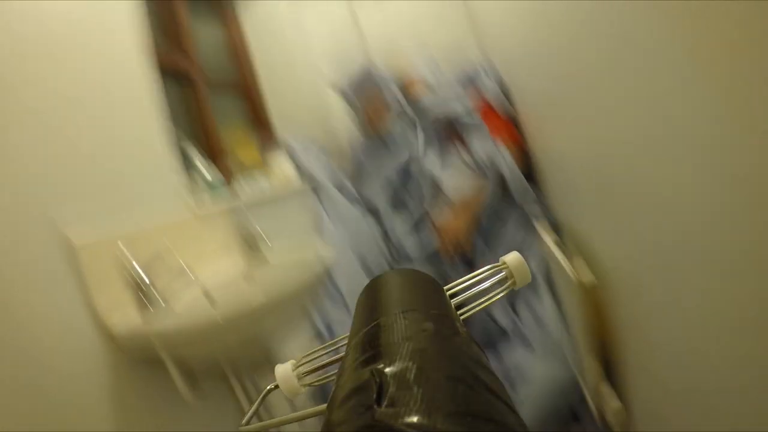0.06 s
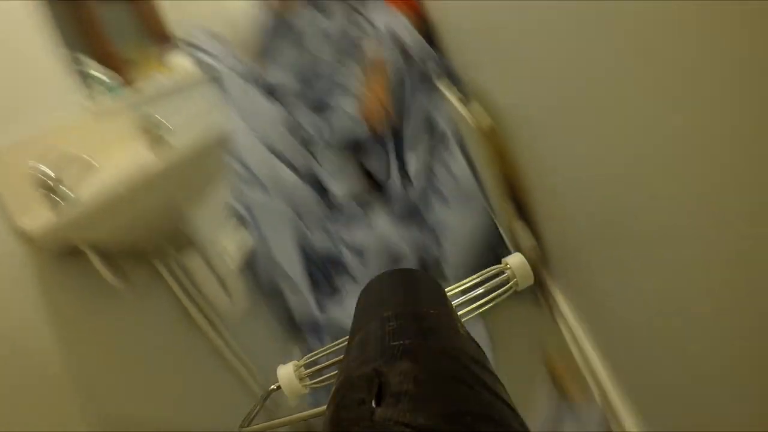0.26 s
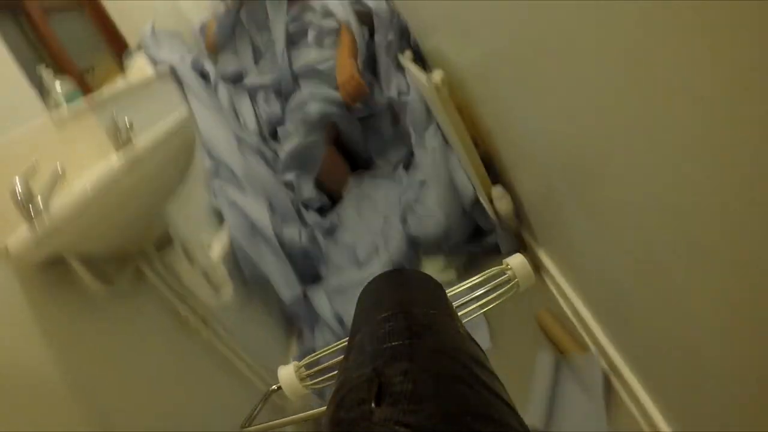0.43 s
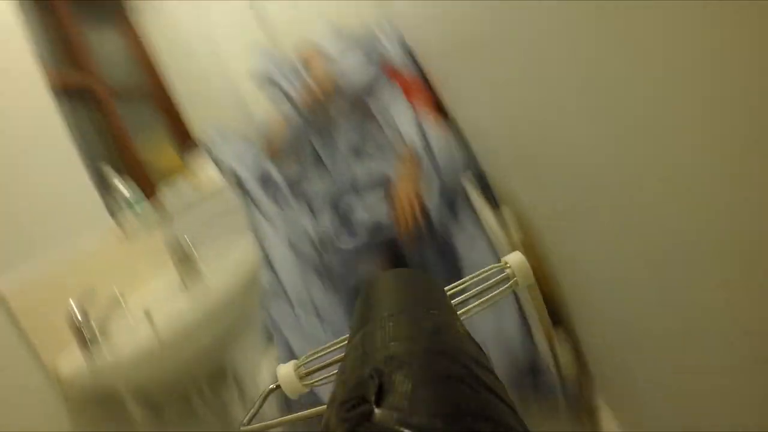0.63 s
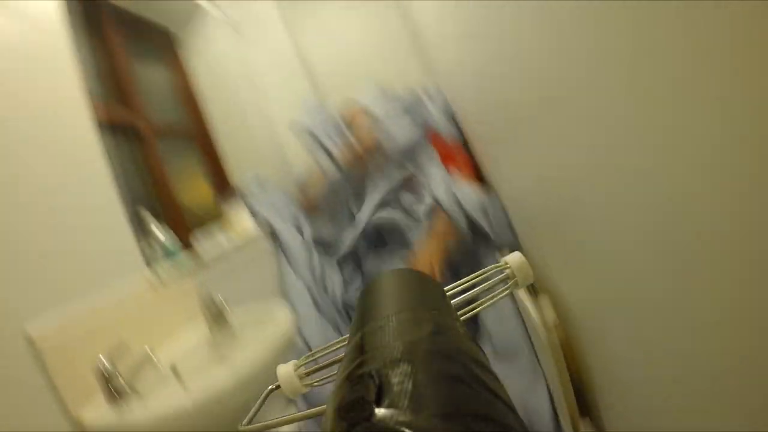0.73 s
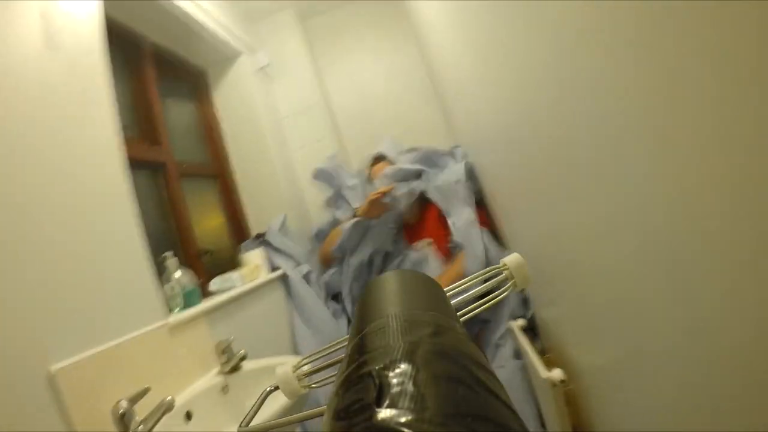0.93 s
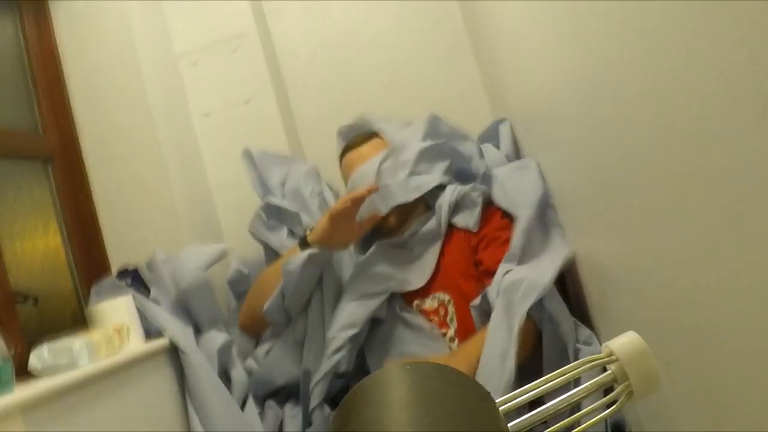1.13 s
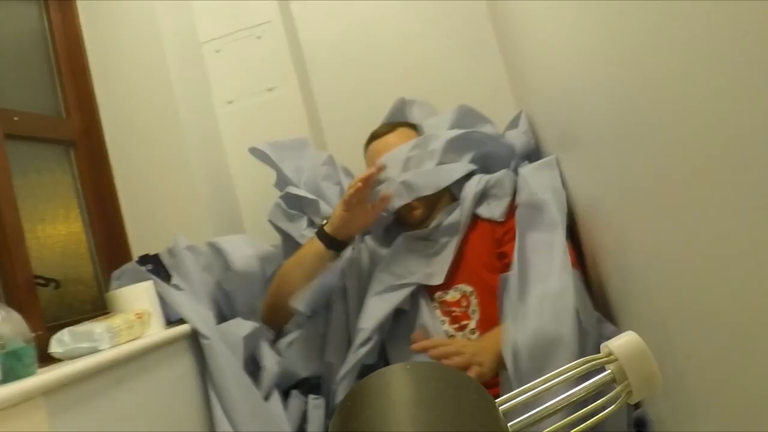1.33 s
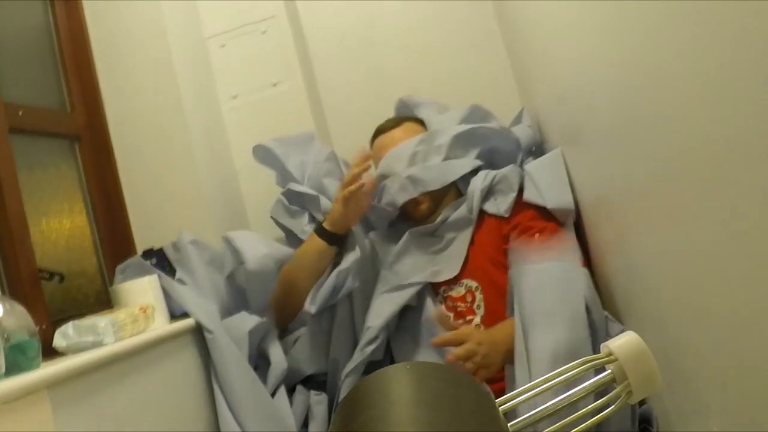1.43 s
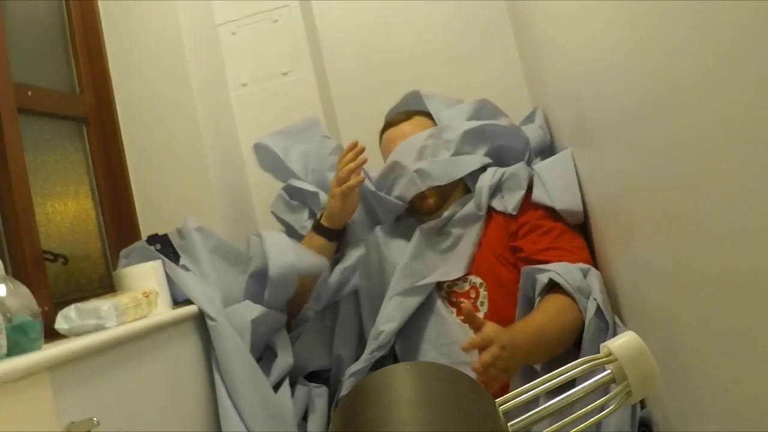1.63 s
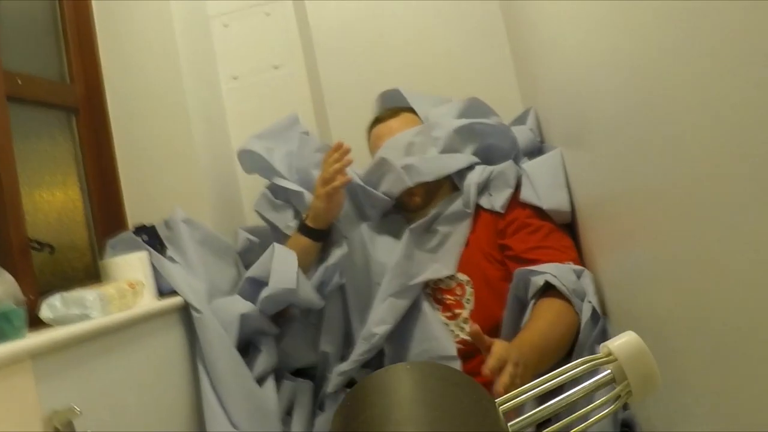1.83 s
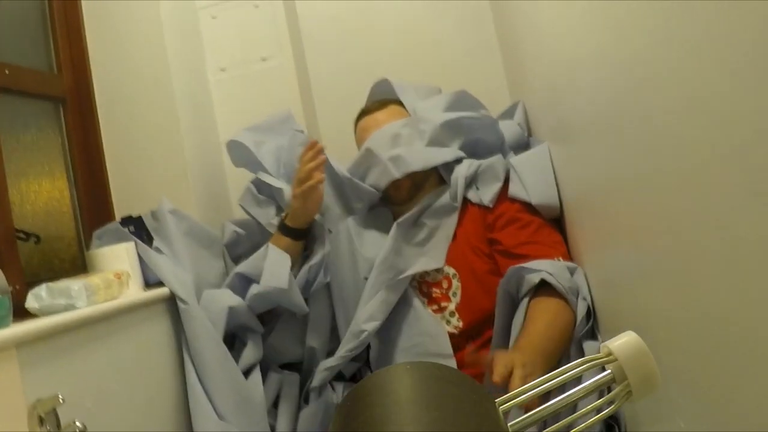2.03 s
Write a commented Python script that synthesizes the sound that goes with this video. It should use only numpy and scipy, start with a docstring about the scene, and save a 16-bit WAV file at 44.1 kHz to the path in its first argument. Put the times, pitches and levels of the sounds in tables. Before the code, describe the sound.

A handheld electric leaf blower, close up in a small bathroom, runs at full speed from 0 to about 0.86 seconds: a strong steady hum, wavering thin whines and bright rushing air. Then it switches off; hum and whines slide down quickly, with a tiny dip near 1.16. Until about 2.07 the duller fan coasts, weak tones swelling and fading over soft rumble, with a low tone rising at the end.

```python
"""A handheld electric leaf blower first runs at full speed: shaft hum, whines and a bright rush of air.
At about 0.86 s it starts to slow down, and hum and whines slide lower while other tones swell and fade.
The rush hands over to the duller noise of the coasting fan, and the level dips briefly near 1.16 s.
Tones are gliding sine waves; air, rumble and the swelling bands are filtered noise.
"""
import sys
import numpy as np
from scipy.fft import rfft, irfft, next_fast_len
from scipy.io import wavfile
from scipy.ndimage import map_coordinates

SR = 44100
rng = np.random.default_rng(int(sys.argv[2]) if len(sys.argv) > 2 else 0)


def transcribe(signal):
    """Save signal, clipped to [-1, 1], as a 16-bit WAV file at the path in sys.argv[1]."""
    frames = np.atleast_2d(signal).T
    limited = np.clip(frames, -1, 1)
    pcm = np.round(limited * 32767).astype(np.int16)
    wavfile.write(sys.argv[1], SR, pcm)


N = 91419
T = np.arange(N) / SR  # time of each sample, seconds

# Speed of the motor shaft. Each row: time in seconds, speed in turns per second.
SHAFT_SPEED = [(0, 304.5), (.86, 304.5), (.91, 271), (.97, 230), (1.05, 199), (1.1, 184), (1.16, 164),
               (1.3, 134), (1.43, 115), (1.56, 101), (1.7, 85), (1.8, 74.5), (1.9, 65), (2.0, 57),
               (2.07, 51.3)]
# Imbalance hum: follows the shaft, then lingers and throbs on the mount's resonance.
# Each row: time in seconds, pitch in Hz, level in dB before flutter.
HUM_PATH = [(0.02, 303.2, -11), (0.3, 306.8, -14.5), (0.345, 304, -14.5), (0.424, 306.1, -12),
            (0.866, 301.5, -12), (0.88, 292, -15), (0.908, 268.6, -13.5), (0.935, 253.2, -21),
            (0.97, 234.7, -21), (1.01, 212.7, -27.5), (1.088, 186.8, -27.5), (1.132, 169, -42),
            (1.196, 159, -40.5), (1.288, 134, -37.5), (1.414, 115.9, -25), (1.444, 112, -25.5),
            (1.462, 103.4, -37), (1.488, 108.2, -28), (1.51, 113, -30), (1.536, 105.5, -55),
            (1.566, 107.3, -36), (1.58, 111, -37.5)]
# Lower whine, near seven times the shaft speed.
# Each row: time in seconds, pitch in Hz, level in dB, both before wavering.
LOW_WHINE_PATH = [(0, 2072, -38.5), (.08, 2072, -34), (.13, 2075, -49), (.62, 2070, -47), (.7, 2068, -37),
                  (.75, 2068, -42), (.85, 2068, -38), (.885, 2045, -35), (.91, 2010, -39),
                  (.925, 1870, -43), (.955, 1680, -35), (.98, 1620, -41), (1.05, 1430, -47),
                  (1.08, 1320, -42), (1.14, 1270, -44), (1.17, 1120, -46), (1.23, 1070, -45),
                  (1.28, 960, -58), (1.33, 875, -53), (1.4, 800, -58), (1.5, 705, -50), (1.62, 655, -40),
                  (1.7, 580, -54), (1.8, 508, -38), (1.86, 460, -48), (1.89, 438, -38), (1.96, 390, -50)]
# Upper whine. Each row: time in seconds, pitch in Hz, level in dB, both before wavering.
HIGH_WHINE_PATH = [(0, 2196, -54), (.19, 2192, -44), (.28, 2195, -29), (.33, 2195, -39), (.39, 2195, -30),
                   (.43, 2195, -45), (.5, 2190, -35), (.57, 2188, -44), (.62, 2186, -33), (.68, 2205, -40),
                   (.75, 2190, -42), (.86, 2190, -49), (.92, 2030, -42), (.95, 1900, -56), (.98, 1720, -42),
                   (1.005, 1575, -35), (1.032, 1545, -30), (1.045, 1510, -42), (1.085, 1490, -41),
                   (1.11, 1540, -46)]
# Shaft orders (tones locked to the shaft) of the driven motor.
# Each row: pitch at full speed in Hz, level at full speed in dB, both before wavering.
DRIVEN_ORDERS = [(914, -51), (1045, -57), (1580, -56), (1705, -55), (1828, -57), (3654, -53), (5000, -62),
                 (7308, -71)]
# Orders that swell as they cross a housing resonance in the run-down.
# Each row: loudest time in seconds, multiple of the shaft speed, spread in seconds,
# peak level in dB before beating.
SWELLS = [(1.04, 12, .03, -36), (1.135, 12, .022, -41), (1.19, 12, .02, -50), (.95, 23.5, .028, -52),
          (1.04, 23.6, .035, -52), (1.19, 24, .02, -57), (1.25, 23.6, .02, -55), (1.17, 2, .09, -43),
          (1.33, 2.57, .055, -38), (1.45, 2.65, .025, -42), (1.47, 12.9, .06, -52), (1.64, 3.68, .05, -45),
          (1.7, 12.65, .1, -50), (1.94, 12.65, .09, -51), (1.79, 4.55, .05, -49), (1.51, 7.3, .05, -50),
          (1.94, 5.52, .04, -41), (1.705, 18.95, .015, -48), (1.79, 18.95, .04, -44),
          (1.95, 18.95, .05, -43), (2.07, 6.34, .055, -26), (1.54, 2.85, .03, -50)]
# Bands of noise, from narrow ringing to broad hiss, that swell and fade at fixed pitch.
# Each row: centre in Hz, width in Hz, peak level in dB, loudest time in seconds, spread in seconds.
NOISE_BANDS = [(2350, 170, -53, 1.3, .22), (1150, 70, -54, 1.8, .2), (400, 200, -45, 1.0, .07),
               (3520, 150, -50, .92, .07), (2030, 70, -46, .96, .05), (3900, 900, -62, 1.8, .25),
               (9500, 3000, -73, 1.95, .35)]
# Resonances of the plastic housing. Each row: centre in Hz, width in Hz, strength in dB before softening.
HOUSING_RESONANCES = [(337, 52, 26), (2526, 270, 20.5)]
# Loudness of the air rush. Each row: time in seconds, level in dB before the boosts and wavering below.
AIR_LEVEL = [(0.05, -44.5), (0.13, -41.5), (0.37, -42), (0.82, -42.5), (0.88, -38), (1.14, -48.5),
             (1.42, -55), (2.05, -58)]
# Colour of the driven jet. Each row: frequency in Hz, relative level in dB before the housing.
JET_COLOUR = [(300, -16), (400, -16), (527, -27.5), (616, -13.5), (737, -26), (904, -14), (1390, -17.5),
              (1670, -12), (1920, -16), (2140, -6), (2660, -25.5), (3770, -15), (6300, -22), (7400, -37),
              (8900, -35), (11200, -52), (12500, -50), (13300, -40.5), (14600, -51)]
# Colour of the coasting fan. Each row: frequency in Hz, relative level in dB before the housing.
COASTING_COLOUR = [(250, -20.5), (400, -10), (456, -5.5), (755, -8.5), (937, -8), (1140, -3), (1250, -13.5),
                   (1410, -4), (1750, -12.5), (2330, -15.5), (2730, -20.5), (4050, -17), (6100, -26.5),
                   (7000, -35.5), (9500, -40.5), (11000, -53.5), (14000, -56)]
# Colour of the low buffeting. Each row: frequency in Hz, relative level in dB.
RUMBLE_COLOUR = [(12, -9.5), (25, -1.5), (45, -4.5), (75, -4.5), (115, -5.5), (200, -9.5), (270, -9),
                 (400, -22.5), (520, -43)]
# Loudness of the buffeting. Each row: time in seconds, level in dB before wavering.
RUMBLE_PATH = [(0, -46), (.82, -45), (.86, -37), (.95, -43), (1.06, -39), (1.15, -48), (1.5, -46),
               (1.65, -44), (1.8, -42), (2.07, -41)]

HUM_FLUTTER_DB, WHINE_WAVER_DB, ORDER_WAVER_DB = .35, 1.3, 3  # size of the random level changes
DRIVEN_FADE_DB = 30  # lost per halving of speed
WHINE_BEATING = .6  # share of a whine that smears and beats once the motor coasts
SWELL_BEATING, FULL_BEATING_HZ = .55, 1100  # share of a swell that beats, full above this pitch
JET_BOOST_DB, COASTING_BOOST_DB = 5, 8.5
HANDOVER_S, HANDOVER_WIDTH_S = 1.215, 0.21  # middle and width of the change from jet to coasting fan
HOUSING_SOFTENING = 0.32  # power applied to the housing gain
DIP_S, DIP_WIDTH_S, DIP_DB = 1.1555, .003, -24  # the brief dip in level
TOP_HZ = 14900  # nothing is heard from here up


def amp(db):
    """Turn dB into gain."""
    return 10 ** (np.asarray(db) / 20)


def curves(rows):
    """Join the rows with straight lines: one curve for each column after the time."""
    times, *columns = np.transpose(rows)
    return [np.interp(T, times, column) for column in columns]


def wobble(rate):
    """Draw a smooth random curve through a given number of random points per second."""
    points = rng.standard_normal(int(N * rate / SR) + 4)
    return map_coordinates(points, [T * rate])


def tone(hz, db):
    """Add up a changing pitch into the phase of a sine wave whose rms level is given in dB."""
    turns = np.cumsum(hz) / SR + rng.random()
    return np.sqrt(2) * amp(db) * np.sin(2 * np.pi * turns)


def noise(colour, body=lambda hz: 1):
    """Shape random noise by a colour table and a body's gain, then scale it to rms 1."""
    size = next_fast_len(N + 8192)
    hz = np.fft.rfftfreq(size, 1 / SR)
    table_hz, table_db = np.transpose(colour)
    # Past the ends of the table the noise is practically silent.
    colour_db = np.interp(np.log(hz + 1), np.log(table_hz), table_db, -120, -120)
    spectrum = rfft(rng.standard_normal(size)) * amp(colour_db) * body(hz)
    x = irfft(spectrum, size)[:N]
    return x / x.std()


def shaft():
    """Give the shaft speed, how often it has halved, and coasting from 0 (full speed) to 1."""
    speed, = curves(SHAFT_SPEED)
    halvings = np.log2(speed[0] / speed)
    coasting = np.minimum(4 * halvings, 1)
    return speed, halvings, coasting


def hum(coasting):
    """An unbalanced shaft shakes the mount, giving a low tone that flutters more while coasting."""
    hz, db = curves(HUM_PATH)
    flutter_db = (HUM_FLUTTER_DB + coasting) * wobble(35)
    return tone(hz, db + flutter_db + ending_db(HUM_PATH))


def ending_db(rows):
    """Fade a tone after its last row by 300 dB per second."""
    return -300 * np.maximum(T - rows[-1][0], 0)


def whine(rows, coasting):
    """A high motor tone wavers in level; its pitch smears and its loudness beats while coasting."""
    hz, db = curves(rows)
    waver_db = WHINE_WAVER_DB * wobble(45)
    beating = 1 + WHINE_BEATING * coasting * wobble(110)
    smear = 1 + (0.0012 + 0.008 * coasting) * wobble(90)
    return beating * tone(hz * smear, db + waver_db + ending_db(rows))


def driven_orders(speed, halvings):
    """Tones locked to the shaft drop in pitch and fade as the motor slows."""
    out = 0
    for full_speed_hz, db in DRIVEN_ORDERS:
        hz = full_speed_hz * speed / speed[0] * (1 + 0.0012 * wobble(60))
        waver_db = ORDER_WAVER_DB * wobble(25)
        out += tone(hz, db - DRIVEN_FADE_DB * halvings + waver_db)
    return out


def swelling_orders(speed):
    """Multiples of the shaft speed swell and fade as they cross a housing resonance."""
    out = 0
    for loudest_s, multiple, spread, db in SWELLS:
        hz = multiple * speed
        beating = 1 + SWELL_BEATING * np.minimum(hz / FULL_BEATING_HZ, 1) * wobble(70)
        swell_db = db - 6 * ((T - loudest_s) / spread) ** 2
        out += beating * tone(hz * (1 + 0.005 * wobble(70)), swell_db)
    return out


def motor():
    """The turning shaft sets off the hum, both whines and the driven and swelling orders."""
    speed, halvings, coasting = shaft()
    whines = whine(LOW_WHINE_PATH, coasting) + whine(HIGH_WHINE_PATH, coasting)
    orders = driven_orders(speed, halvings) + swelling_orders(speed)
    return hum(coasting) + whines + orders


def housing(hz):
    """The plastic housing strengthens frequencies near its resonances, here in softened form."""
    power = 1
    for centre, width, db in HOUSING_RESONANCES:
        power = power + amp(db) ** 2 / (1 + (2 * (hz - centre) / width) ** 2)
    return np.sqrt(power) ** HOUSING_SOFTENING


def air_rush():
    """The bright rush of the jet gives way to the duller noise of the coasting fan."""
    level_db, = curves(AIR_LEVEL)
    coast = 1 / (1 + np.exp(-(T - HANDOVER_S) / HANDOVER_WIDTH_S))
    jet = amp(JET_BOOST_DB) * (1 - coast) * noise(JET_COLOUR, housing)
    fan = amp(COASTING_BOOST_DB) * coast * noise(COASTING_COLOUR, housing)
    return amp(level_db + 0.98 * wobble(20.02)) * (jet + fan)


def noise_bands():
    """Bands of noise, from narrow ringing to broad hiss, swell and fade at fixed pitch as the motor slows."""
    out = 0
    for centre, width, db, loudest_s, spread in NOISE_BANDS:
        def band(hz):
            return 1 / (1 + (2 * (hz - centre) / width) ** 2)
        level_db = db - 4.5 * ((T - loudest_s) / spread) ** 2
        out += amp(level_db) * noise([(20, 0.0037), (20000, 0)], band)  # practically even noise
    return out


def rumble():
    """Low buffeting is deep noise that wavers in level under everything else."""
    level_db, = curves(RUMBLE_PATH)
    return amp(level_db + 2.8 * wobble(10)) * noise(RUMBLE_COLOUR)


def scene():
    """Add all sources into one channel."""
    return (motor() + air_rush() + noise_bands() + rumble())[None]


def record(dry):
    """Dip the level briefly, then remove everything from TOP_HZ up."""
    dip_db = DIP_DB * np.exp(-((T - DIP_S) / DIP_WIDTH_S) ** 2)
    size = next_fast_len(N + 4096)
    kept = np.fft.rfftfreq(size, 1 / SR) < TOP_HZ
    return irfft(rfft(dry * amp(dip_db), size) * kept, size)[..., :N]


dry = scene()
out = record(dry)
transcribe(out)
```